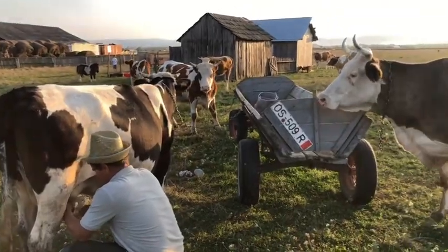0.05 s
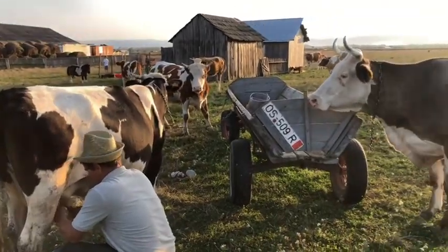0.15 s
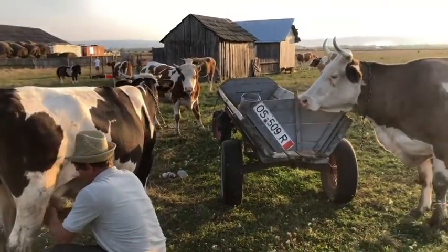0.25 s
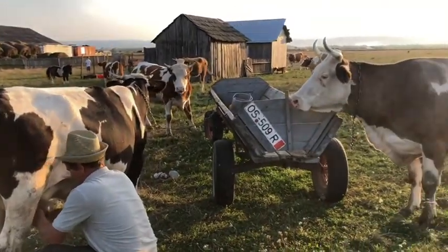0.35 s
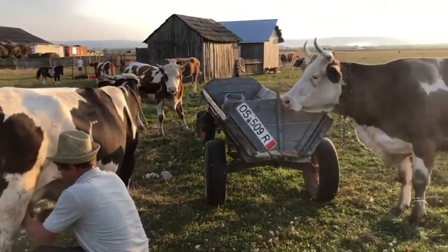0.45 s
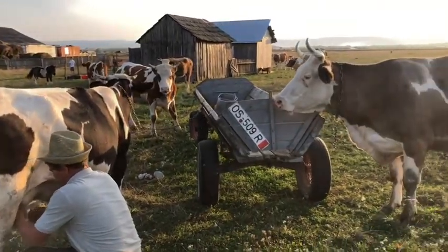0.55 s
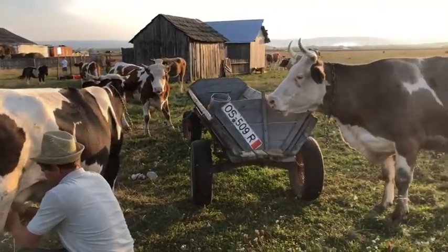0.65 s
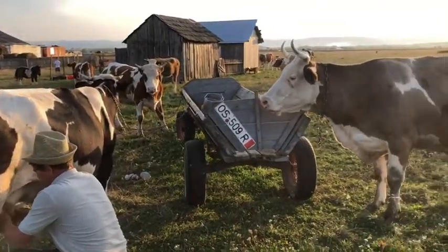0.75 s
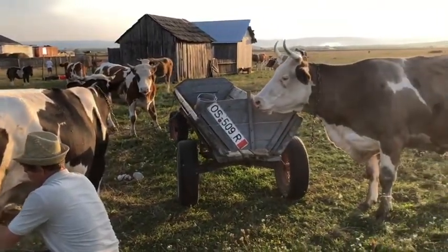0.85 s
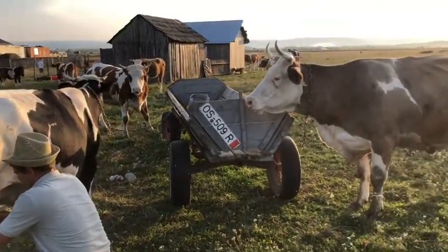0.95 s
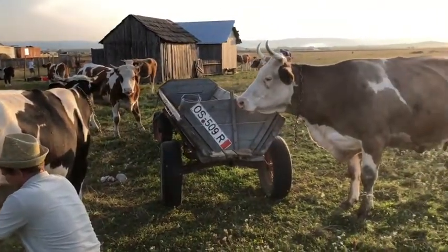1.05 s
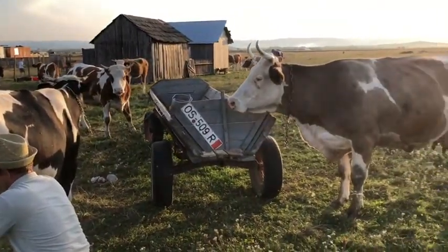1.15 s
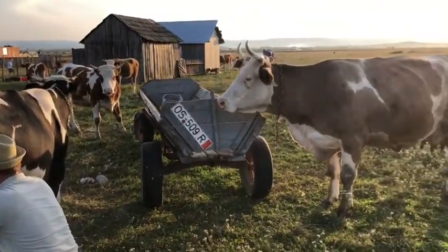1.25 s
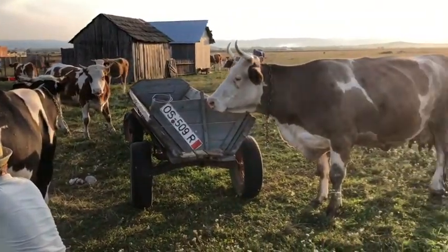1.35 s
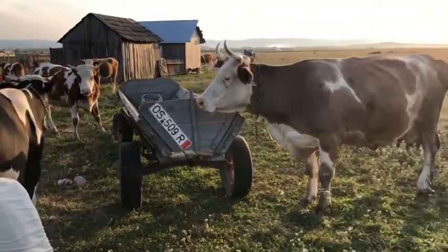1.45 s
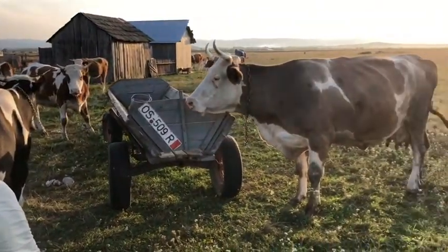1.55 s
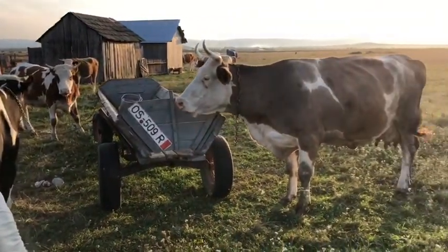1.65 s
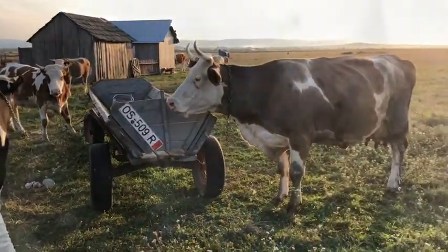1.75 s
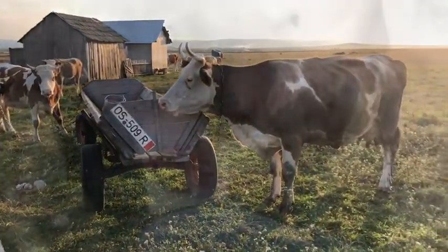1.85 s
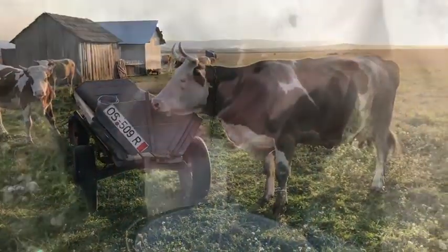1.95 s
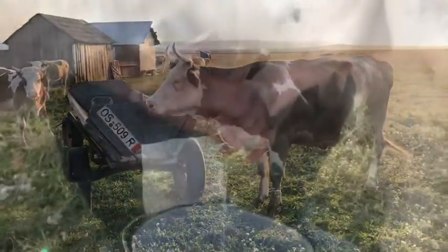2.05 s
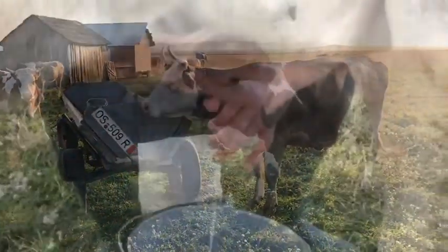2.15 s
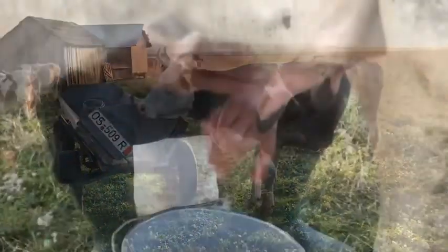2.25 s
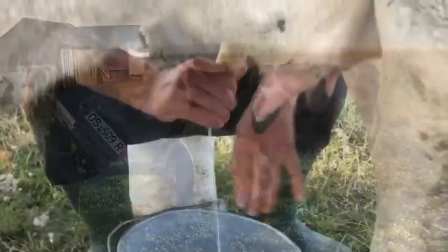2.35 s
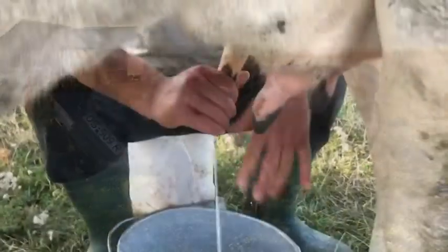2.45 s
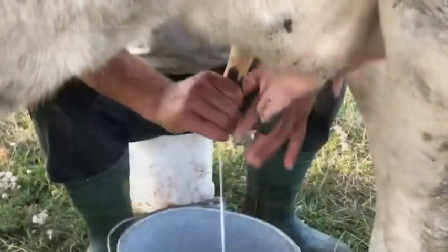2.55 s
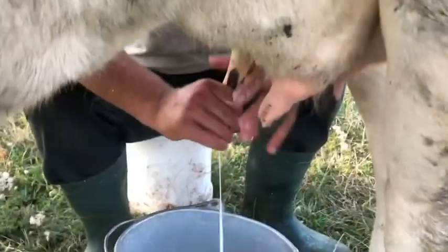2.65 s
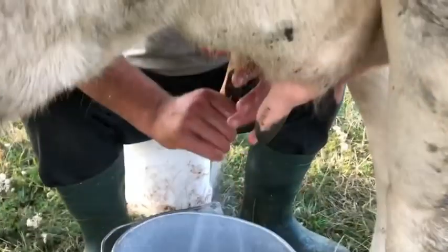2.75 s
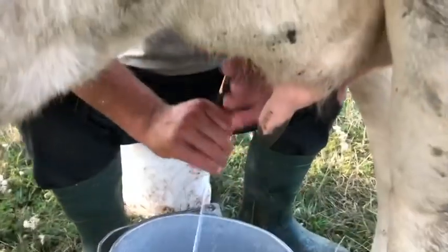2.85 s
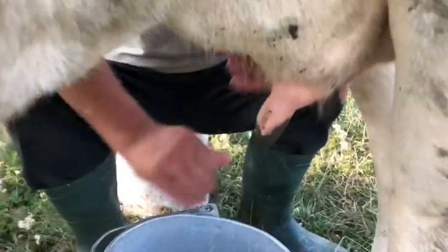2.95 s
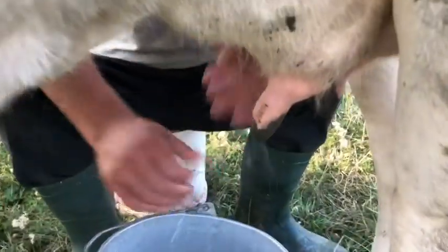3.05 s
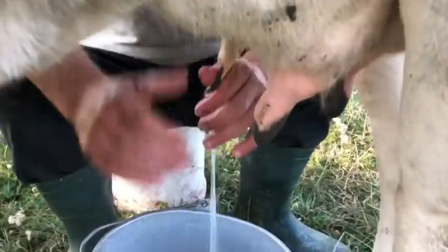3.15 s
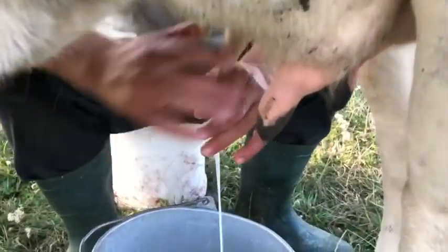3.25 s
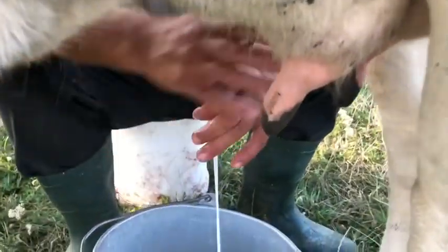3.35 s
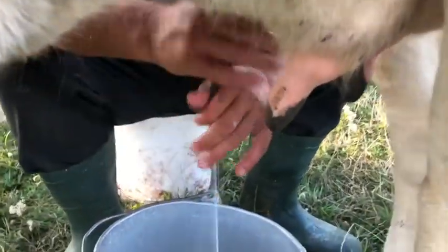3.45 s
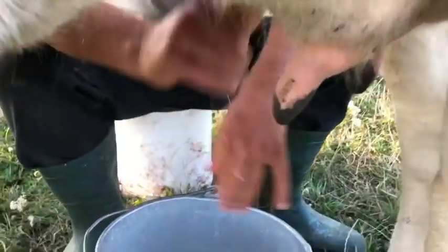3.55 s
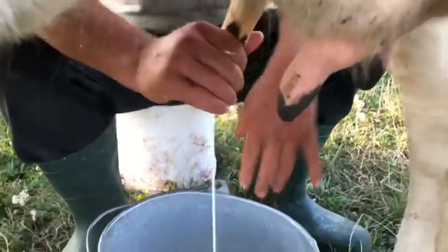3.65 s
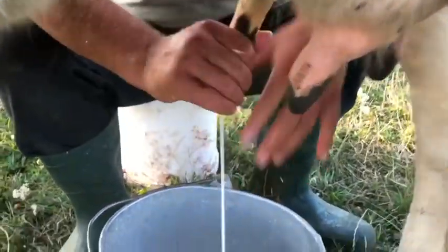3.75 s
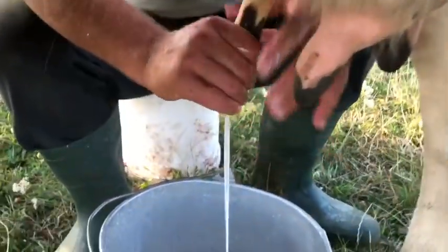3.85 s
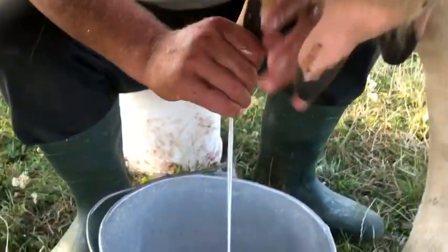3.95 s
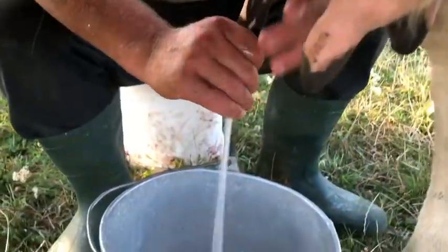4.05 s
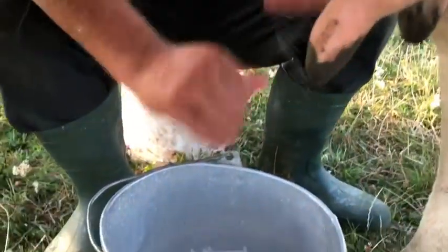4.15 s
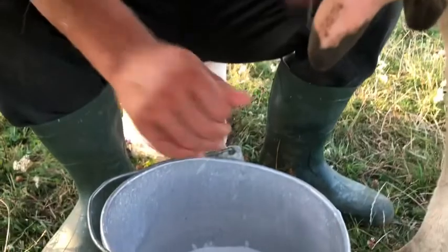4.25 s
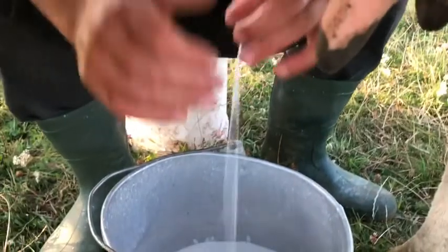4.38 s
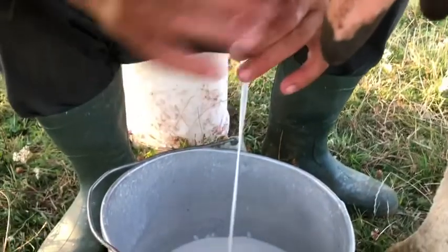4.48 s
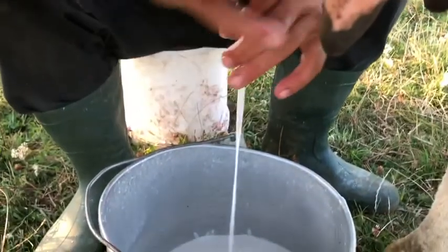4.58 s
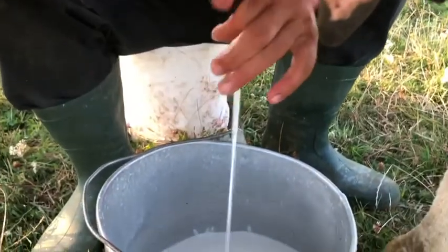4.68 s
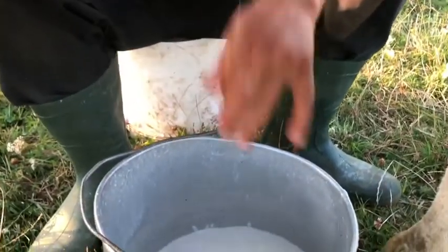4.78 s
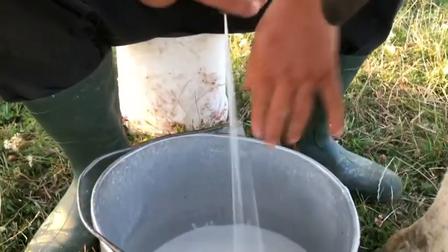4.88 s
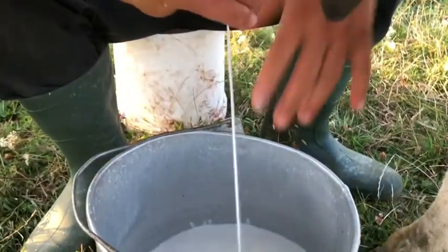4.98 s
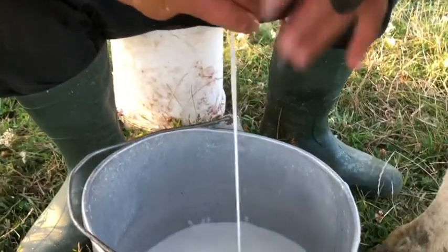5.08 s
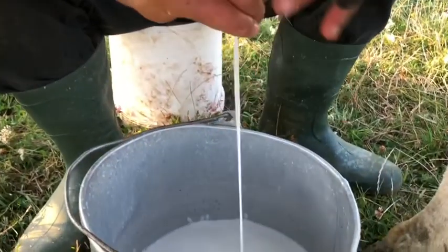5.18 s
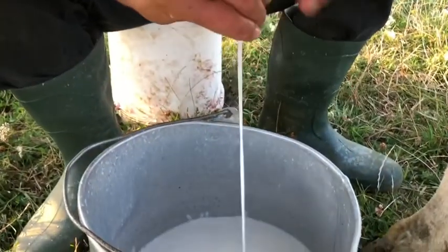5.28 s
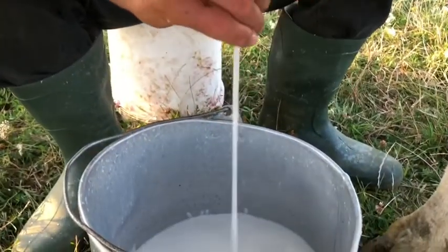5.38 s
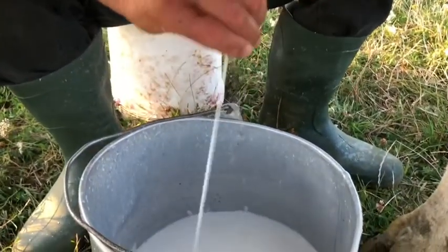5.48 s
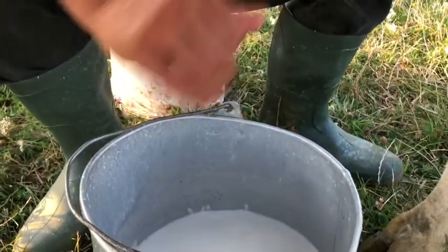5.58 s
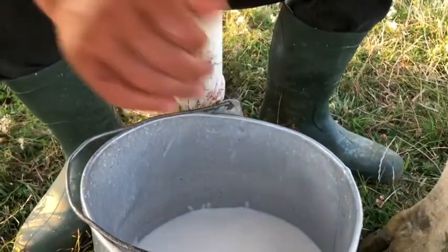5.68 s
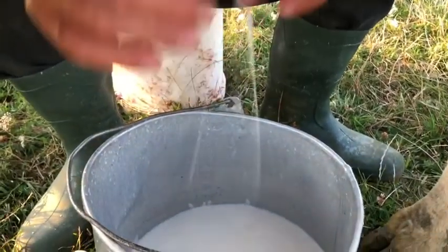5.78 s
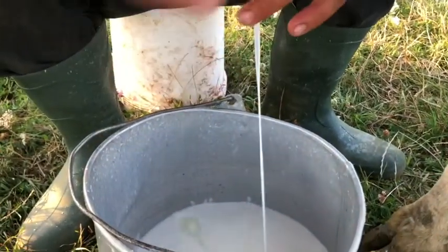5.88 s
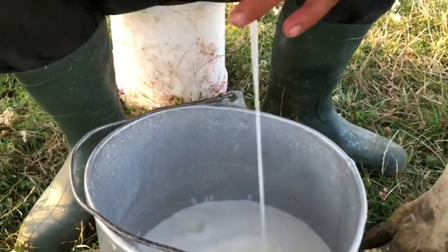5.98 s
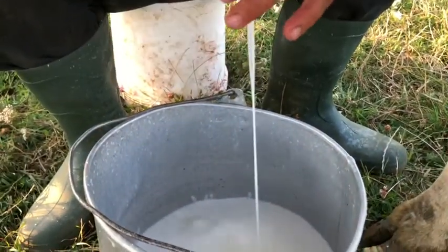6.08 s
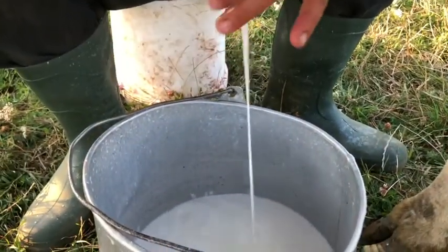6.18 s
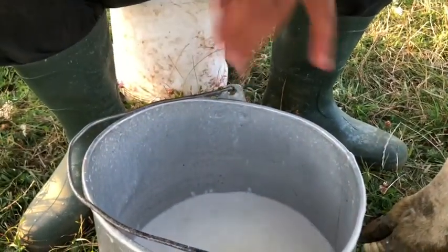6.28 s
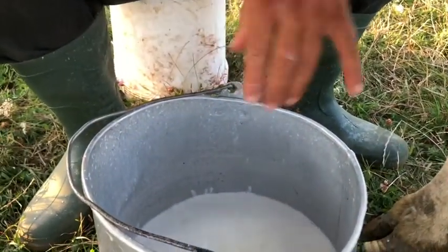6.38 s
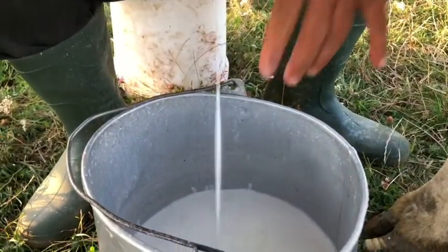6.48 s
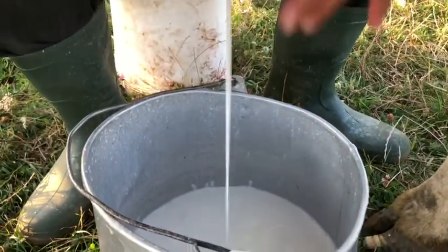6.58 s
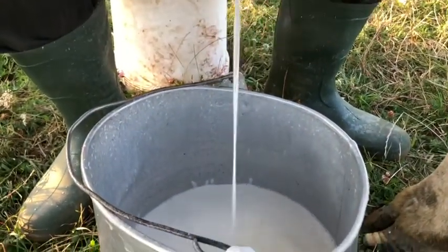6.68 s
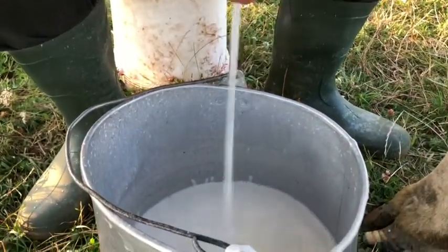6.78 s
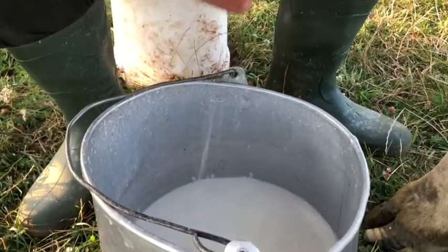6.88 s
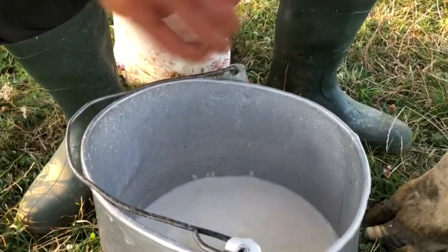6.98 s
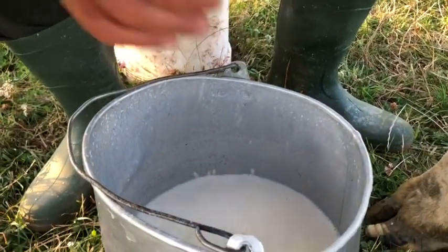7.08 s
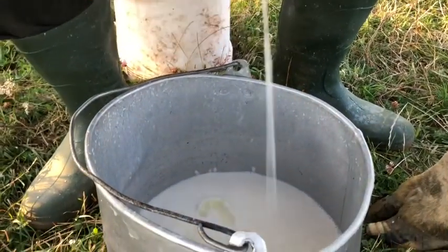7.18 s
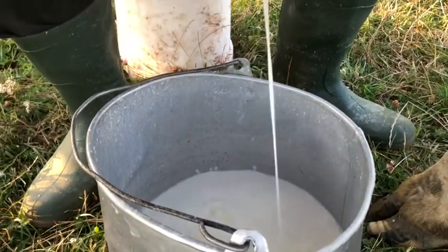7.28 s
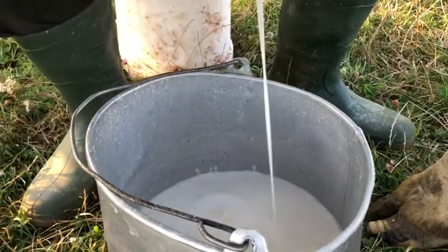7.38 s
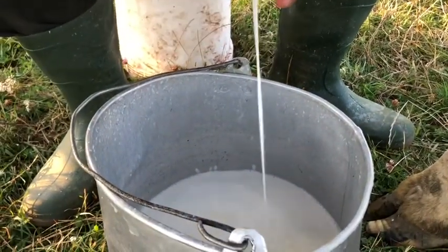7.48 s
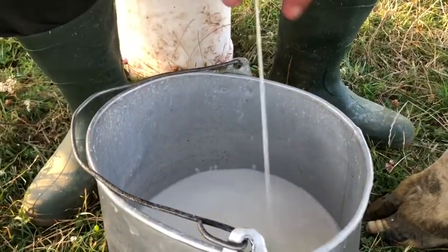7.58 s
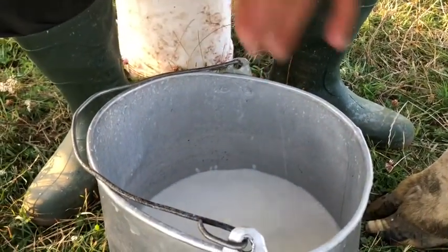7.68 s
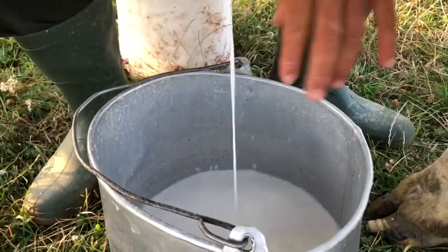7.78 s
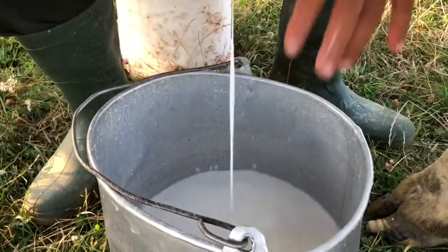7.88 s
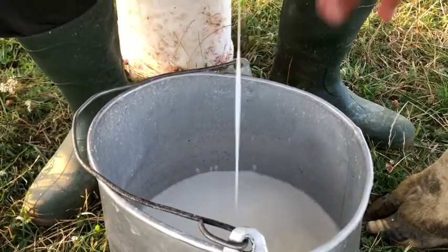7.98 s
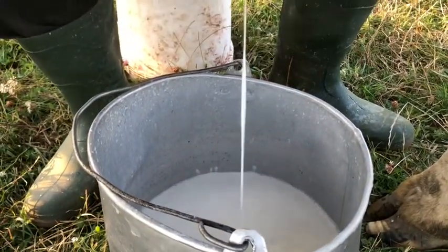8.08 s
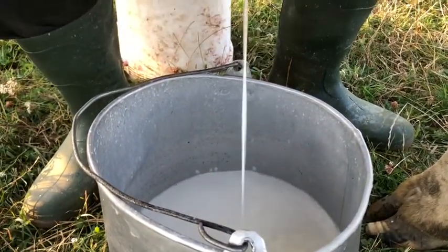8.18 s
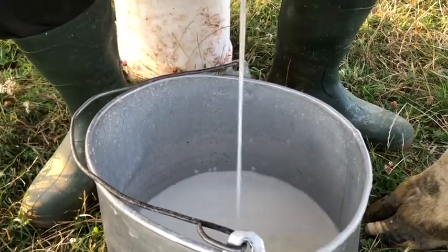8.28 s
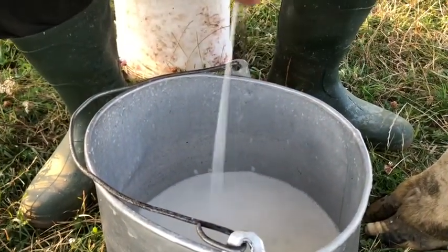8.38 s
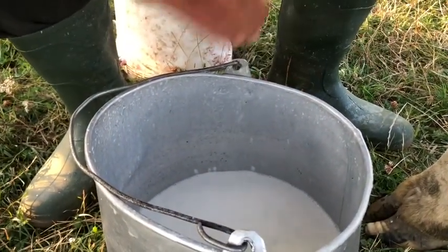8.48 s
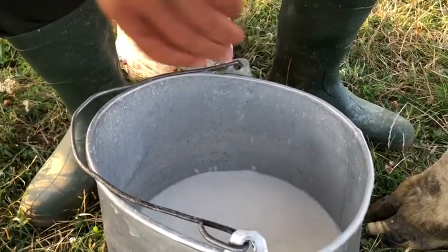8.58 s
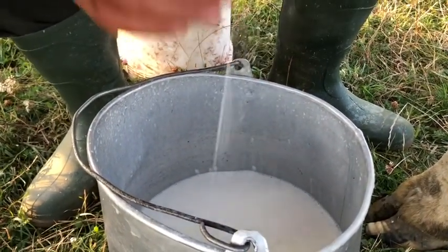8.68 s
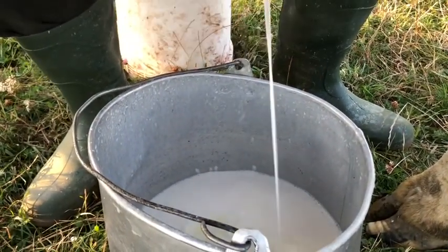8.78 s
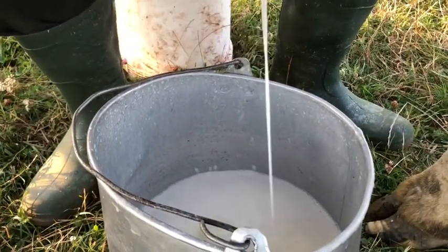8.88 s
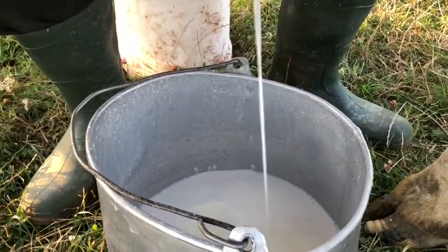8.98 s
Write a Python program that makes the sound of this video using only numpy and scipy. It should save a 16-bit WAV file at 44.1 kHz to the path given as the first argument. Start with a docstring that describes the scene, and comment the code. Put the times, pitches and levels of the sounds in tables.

```python
"""Hand milking in an open pasture, over light wind and the hush of the field.
Faint jets from afar open the scene: noise hiss, ringing air bubbles and resonant pail modes under each.
A cow then lows softly once, a few clean harmonics rising with the mouth shut.
From there the milk hits the froth up close: splats, hiss, gurgling air pockets and a drumming metal pail.
Droplets patter after each jet, and drips tick now and then to the end."""
import sys
import numpy as np
from scipy import signal
from scipy.io import wavfile
from scipy.ndimage import uniform_filter1d, map_coordinates

SR = 44100
rng = np.random.default_rng(int(sys.argv[2]) if len(sys.argv) > 2 else 0)


def to_wav(s):
    """Save 16-bit WAV."""
    ch = np.atleast_2d(s).T  # columns
    pcm = np.round(np.clip(ch, -1, 1) * 32767)  # PCM
    wavfile.write(sys.argv[1], SR, pcm.astype(np.int16))


N = 398223  # length in samples

# one squeeze of the teat a row: landing t/s, plunge delay/s, flow length/s, fade/(dB per s), splat level/dB,
# early and late spray level/dB, early and late bubbling level/dB, early and late drumming level/dB,
# then by landing spot: deep, middle and upper pail mode level/dB (levels before the final mix trims)
JETS = [(.229, 0.02, .26, 230, -39, -55, -54, -40, -47, -51.5, -53.5, 2.5, -14, 7),
        (0.716, 0.022, .23, 258, -41, -51.5, -52.5, -35.5, -53, -47, -53, 6, -14, 5),
        (1.188, .004, 0.083, 500, -39, -51, -53.5, -60, -74, -50, -56, 8.5, -6, -3),
        (1.745, .02, 0.046, 300, -72, -65, -54.5, -57, -54, -69, -61, 1, 4, 2),
        (2.025, 0.052, 0.24, 262, -36, -43.5, -34, -33, -46, -47, -39.5, -16, -5, -1.5),
        (2.459, 0.0058, 0.53, 475, -18, -41.5, -31.5, -32.5, -35.5, -40.5, -39.5, -4.5, 1, 1),
        (3.230, 0.059, 0.33, 415, -15, -41, -30, -25.5, -35, -38.5, -30, -11, -3, -6.5),
        (3.7232, 0.017, .47, 383, -17.5, -38.5, -28.5, -27.5, -38, -32, -36.5, -9.5, -9, 3),
        (4.4723, 0.055, 0.36, 554, -13.5, -33.5, -25, -29.5, -34, -35, -32, -0.5, -1, -8.5),
        (4.985, 0.031, 0.64, 380, -16, -34, -34, -29.5, -35, -33, -32, 1.5, -12, -4),
        (5.904, 0.059, 0.45, 396, -12.5, -36, -31, -35.5, -27, -38, -30.5, -4, -1, -4),
        (6.528, 0.014, 0.45, 420, -16, -34.5, -32.5, -26.5, -39, -30, -39, -6.5, 3, -0.5),
        (7.232, 0.025, 0.46, 230, -11, -40, -30.5, -31, -29.5, -35, -29, -5, -2, -8.5),
        (7.8411, 0.016, 0.683, 380, -17.5, -33, -30.5, -36.5, -33, -33.5, -32.5, -0.5, -1.5, -0.5),
        (8.802, 0.058, 0.41, 397, -15, -36, -38, -25.5, -37, -36, -35.5, -4, 8, -2)]
# the jet slips out of its hole and bubbling drops: t/s, length/s, level/dB
LAPSES = [(2.843, 0.085, -29), (3.372, 0.06, -8), (4.604, 0.13, -6), (7.348, 0.11, -3)]
# colour of the spray hiss: f/Hz, relative level/dB
SPRAY = [(900, -57), (1800, -13.5), (3000, 1.5), (4500, -2), (7000, 2), (11000, 1.5), (14500, 3),
         (16000, 0)]
# colour of the froth by bubble size: f/Hz, relative level/dB
FROTH = [(800, -5), (1850, 0.5), (2500, -4), (3300, -4.5), (4300, -10.5), (6500, -14.5)]
# ringing modes of the pail: f/Hz, width/Hz, relative level/dB
PAIL = [(172, 4.4, -22.5), (305, 21.5, 1.5), (490.3, 19, -3), (658, 27, -1.5), (729.5, 27, 3.5),
        (849, 23, -9.5), (933, 29, -2.5), (1069, 29, -2), (1175, 32, -7)]
# air pockets singing under the jet: t/s, length/s, f/Hz, level/dB
GURGLES = [(0.261, 0.097, 1720, -43), (0.263, 0.18, 1150, -47), (0.272, 0.17, 2580, -48.5),
           (0.732, 0.12, 1720, -45), (0.736, 0.12, 1080, -45), (2.122, 0.068, 2700, -35),
           (2.487, 0.055, 1410, -35.5), (2.58, 0.123, 3320, -35), (2.63, 0.12, 1100, -38),
           (3.766, 0.06, 1890, -33), (3.799, 0.34, 743, -35.5), (3.844, 0.028, 2840, -28.5),
           (4.539, 0.059, 2270, -29), (4.542, 0.075, 1140, -34.5), (4.634, 0.067, 314, -34),
           (4.738, 0.029, 4430, -29.5), (4.766, 0.042, 3420, -31.5), (5.014, 0.083, 2550, -32),
           (5.157, 0.049, 2070, -31), (5.312, 0.19, 942, -32.5), (5.968, 0.072, 2090, -26.5),
           (6.289, 0.063, 1000, -30), (6.54, 0.09, 1620, -28), (7.254, 0.084, 1890, -35),
           (7.54, 0.1, 1700, -32), (7.865, 0.073, 1680, -29), (8.133, 0.26, 870, -35.5),
           (8.865, 0.11, 1286, -33.5), (8.862, 0.094, 2040, -28.5)]
# single drops: t/s, tick peak level/dB, bubble ring peak level/dB, bubble f/Hz
DRIPS = [(0.551, -40, -46, 3200), (1.052, -54, -53, 3500), (2.3144, -30, -34, 3210),
         (2.3294, -27, -44, 2300), (2.3738, -50, -45, 3000), (3.043, -30, -48, 3740),
         (3.064, -31.5, -36, 3350), (3.077, -47, -35, 3300), (3.096, -55, -31, 3440),
         (3.2400, -11, -39, 2980), (3.244, -12, -39, 3000), (3.6451, -56, -44, 3370),
         (4.076, -13, -21.5, 2650), (4.518, -30, -26, 3470), (4.668, -14, -20.5, 2460),
         (4.8212, -11, -22, 2450), (4.896, -39, -42, 3300), (4.914, -50, -44, 2900),
         (4.9426, -32, -60, 3200), (5.645, -52, -39, 2070), (5.7153, -50, -45, 1900),
         (6.4464, -52, -39, 2700), (6.869, -28, -23, 8500), (6.95, -18, -23, 8600), (7.279, -28, -22, 1810),
         (7.3344, -28, -19, 2040), (8.3648, -18.5, -34, 3200), (8.5117, -26.5, -24.5, 1360),
         (8.81, -11, -29, 4500), (8.8462, -24, -21, 6540)]
# thin falling whistle in a weak squirt: t/s, length/s, start f/Hz, end f/Hz, level/dB
WHISTLE = (1.186, .07, 2350, 2120, -52)
# taps of a small metal ring: t/s, peak level/dB
CLINKS = [(0.1017, -49)]
# partials of that ring: f/Hz, relative level/dB, 60 dB decay/s
RING = [(8400, -1, 0.073), (12770, -6, 0.08), (13360, -6, 0.11)]
# dull low knocks: t/s, level/dB, f/Hz
THUMPS = [(1.191, -46, 278), (1.2, -51, 145), (2.393, -40.5, 332), (4.77, -42, 168), (6.989, -39.5, 107),
          (7.7, -45.5, 109)]
# course of the cow's call: t/s, f/Hz, level/dB
LOWING = [(1.62, 105.3, -65), (1.75, 108.3, -60.5), (1.95, 112.2, -59.5), (2.09, 130, -60),
          (2.26, 162, -55), (2.36, 184, -63), (2.451, 188, -64)]
# harmonics of the closed mouth: multiple of the pitch, level/dB
LOW_TONES = [(1, 2), (2, 0.5), (3, -16.5), (6, -10), (7, -17)]
# colour of the open air: f/Hz, relative level/dB
FIELD = [(40, -5.5), (110, -6.5), (170, -10.5), (500, -15), (1100, -31), (1600, -22.5), (3000, -24),
         (16000, -26.5)]
# treble of the field, louder near the fizzing froth: t/s, level/dB
HUSH = [(0.3, -74), (1.6, -75.5), (1.95, -68.5), (2.4, -63.5), (9.03, -63)]
# soft wash near 1 kHz: t/s, level/dB
WASH = [(0, -61), (1.4, -65), (1.9, -63.5), (2.5, -64)]
# wind rumble: t/s, level/dB
WIND = [(0, -60), (.4, -60.5), (1.2, -66), (2.3, -64), (3.0, -60), (4.0, -62), (6.3, -59), (9.03, -58)]

ONSET_S, PLUNGE_S = 0.0077, 0.015  # fade-in of a jet; time its plunge takes
GONE_DB = -45.5  # a jet is cut once its fade reaches this
HEAD_DB, DIP_DB, SETTLE_S = 5.5, -1.5, 0.073  # spray: loud on closed froth, muffled by the plunge, settled
SHALLOW_DB, AIR_STOPS_S = -22.5, 0.02  # bubbling before the plunge; it stops this long before the flow
DRUM_START_DB, DRUM_RISE_S, DRUM_FADE = -8.5, 0.059, 0.77  # the pail rings up; its fade as share of the spray's
PATCHY_DB, SWARM_DB = 3.2, 5  # unevenness of the spray and of the bubble swarms
DETUNE, SPOT_DB = 0.025, 4  # largest mode shift (share) and level change per jet
SAG_PER_S = 0.71  # pitch drop of small pockets (share per s)
TRICKLE_PER_S, TRICKLE_DB, TRICKLE_S = 120, -5, 0.067  # droplet rate; least offset; time to lose 10 dB
NOSE_HZ, NOSE_DB = 320, 9  # cow harmonics near this pitch are lifted
FIELD_DB, WIND_HZ = -55.5, 141  # air level before its bands are set; upper edge of the rumble
EDGE_HZ = 15880  # upper band limit


def gain_of(db):
    """Turns decibels into an amplitude factor."""
    return 10 ** (np.asarray(db) / 20)


def evened(x):
    """Scales a sound to rms 1."""
    return x / np.sqrt(np.mean(x ** 2) + 1e-20)


def read(points, at):
    """Reads a colour curve on a logarithmic frequency scale."""
    f, value = np.transpose(points)
    return np.interp(np.log(at + 1), np.log(f + 1), value)


def add(mix, s, sound):
    """Lays a sound into the mix at s seconds, cut at the end of the mix."""
    part = mix[round(s * SR):][:len(sound)]
    part += sound[:len(part)]


def resonate(x, hz, width):
    """Shifts the curve hz down to zero, smooths, and shifts back: a resonance of gain 1."""
    turn = np.exp(2j * np.pi * np.cumsum(hz * np.ones(len(x))) / SR)
    r = np.exp(-np.pi * width / SR)
    smooth = signal.lfilter([1 - r], [1, -r], x / turn + 1e-18)
    return 2 * (turn * smooth).real


def wander(seconds):
    """Random drift of rms 1 that changes over the given time."""
    span = max(round(seconds * SR), 2)
    return evened(uniform_filter1d(uniform_filter1d(rng.standard_normal(N), span), span))


def noise(points, patchy_db, size=512):
    """Random short-time spectra of a given colour, with drifting patches."""
    hop = size // 4
    a, b, patches = rng.standard_normal((N // hop + 5, size // 2 + 1, 3)).T
    patches = evened(uniform_filter1d(uniform_filter1d(patches, 6, 0), 16, 1))
    colour_db = read(points, np.fft.rfftfreq(size, 1 / SR))[:, None]
    spectra = (a + 1j * b) * gain_of(colour_db + patchy_db * patches)
    return evened(signal.istft(spectra, nperseg=size, noverlap=size - hop)[1][:N])


def jets():
    """Spray, bubbles and pail follow their own level curves and share the sputter of the stream."""
    spray_gain, froth_gain, drum_gain = controls()
    sputter = 2.66 * np.tanh(wander(0.011) / 2)
    push = rng.standard_normal(N) * gain_of(0.29 * sputter)
    drum = pail(push * drum_gain)
    drum *= np.linalg.norm(drum_gain) / np.linalg.norm(drum)
    hiss = spray_gain * spray(gain_of(1.3 * sputter))
    froth = froth_gain * bubbles(gain_of(2.12 * sputter))
    return hiss + gain_of(-0.5) * froth + gain_of(-2.5) * drum


def controls():
    """Gains of spray, bubbling and drumming over the whole scene; zero between jets."""
    out = np.zeros((3, N))
    for s, plunge, flow, fade, _, *db in JETS:
        t = np.arange(0, flow - GONE_DB / fade, 1 / SR)
        levels = stream(t, plunge, flow, fade, db[0:2], db[2:4], db[4:6])
        for track, level_db in zip(out, levels):
            add(track, s, np.minimum(t / ONSET_S, 1) * gain_of(level_db))
    for s, length, db in LAPSES:
        span = slice(round(s * SR), round((s + length) * SR))
        out[1, span] *= gain_of(db * signal.windows.tukey(span.stop - span.start, .4))
    return out


def stream(t, plunge, flow, fade, spray_db, froth_db, drum_db):
    """Levels in dB of one jet's three sounds: landing, plunge, steady flow, dying away."""
    def along(ends):
        return np.interp(t, [0, flow], ends)

    def after(s):
        return fade * np.maximum(t - s, 0)

    under = plunge + PLUNGE_S
    head = np.interp(t, [0, under, under + SETTLE_S], [HEAD_DB, DIP_DB, 0])
    shallow = np.interp(t, [plunge, under], [SHALLOW_DB, 0])
    ring_up = np.interp(t, [0, DRUM_RISE_S], [DRUM_START_DB, 0])
    return (along(spray_db) + head - after(flow),
            along(froth_db) + shallow - after(flow - AIR_STOPS_S),
            along(drum_db) + ring_up - DRUM_FADE * after(flow))


def spray(sputter):
    """The jet breaks into droplets: a crackling hiss, mirrored by the pail wall."""
    fat_drops = (rng.random(N) < 250 / SR) * np.minimum(rng.exponential(0.71, N), 2.4)
    crackle = 1 + signal.lfilter([1], [1, -np.exp(-1 / (0.00085 * SR))], fat_drops)
    hiss = noise(SPRAY, patchy_db=PATCHY_DB) * gain_of(2.0 * wander(0.00052)) * crackle * sputter
    for delay_s, share in [(.00044, .33), (.00095, .25)]:
        # the path by the wall shifts as the jet wanders
        lag = delay_s * SR * (1 + .06 * wander(.4))
        hiss = hiss + share * map_coordinates(hiss, [np.arange(N) - lag], order=3)
    # the treble sets the loudness
    top = signal.sosfilt(signal.butter(4, 4500, "high", fs=SR, output="sos"), hiss)
    return hiss / top.std()


def bubbles(sputter, per_s=250, cycles=18.0, count=28):
    """Trapped air rings briefly with rising pitch, in swarms of one size; the pail's depth echoes it."""
    out = np.zeros(N)
    swarms = evened(uniform_filter1d(rng.standard_normal((count, N // 500 + 1)), 8))
    swarms = gain_of(SWARM_DB * swarms)
    for f, swarm in zip(np.geomspace(800, 6500, count), swarms):
        train = (rng.random(N) < per_s / SR) * gain_of(2.0 * np.minimum(rng.exponential(1, N), 5))
        train = train * np.repeat(swarm, 500)[:N]
        turns = np.arange(0, 30, f / SR)
        ping = np.sin(2 * np.pi * turns * (1 + 0.00635 * turns))
        ping *= np.exp(-np.pi * turns / cycles) * np.minimum(turns, 1)
        out += signal.oaconvolve(train, ping * gain_of(read(FROTH, f)) * f / 2000)[:N]
    out *= sputter
    lag = 0.004 * SR * (1 + 0.052 * wander(0.32))
    out = out + 0.51 * map_coordinates(out, [np.arange(N) - lag], order=1)
    # ride the slow level flat so the jet curves set it
    return out / np.sqrt(uniform_filter1d(out ** 2, SR // 8) + 1e-9)


def pail(drive):
    """The stream shakes the pail: narrow modes over a broad slosh; the landing spot sets their mix."""
    s, *_, deep_db, middle_db, upper_db = np.transpose(JETS)
    jet = np.maximum(np.searchsorted(s, np.arange(N) / SR) - 1, 0)  # latest jet at each sample
    slosh = resonate(resonate(drive, 580, 530), 580, 530)
    out = gain_of(5.5) * slosh / np.sqrt(600)
    for f, width, db in PAIL:
        spot_db = (deep_db if f < 400 else middle_db if f < 600 else upper_db)[jet]
        # each jet loads the wall elsewhere
        shift, share = rng.uniform(-0.93, 1, (len(s), 2))[jet].T
        drift = 1 + DETUNE * shift + 0.01 * wander(0.15)  # the sloshing milk loads the wall unevenly
        flutter = gain_of(db + 4 * wander(.05))
        mode = resonate(drive * gain_of(spot_db + SPOT_DB * share), f * drift, width)
        out += flutter * mode / np.sqrt(width)
    return out


def gurgles():
    """Uneven droplet knocks ring the air pocket while it lasts; its size wavers, a small one rings wider."""
    out = np.zeros(N)
    knock = rng.standard_normal(N) * gain_of(2.2 * wander(0.00041) + 2.0 * wander(0.001))
    waver = 1 + 0.029 * wander(0.039)
    for s, length, hz, db in GURGLES:
        drive, pitch = (x[round(s * SR):][:round(length * SR)] for x in (knock, hz * waver))
        if hz > 1300:  # small pockets grow and drop in pitch
            pitch = pitch * (1 + SAG_PER_S * (length / 2 - np.arange(len(drive)) / SR))
        width = 15 + 65 * (hz / 1000) ** 1.9
        pocket = evened(resonate(resonate(drive, pitch, width), pitch, 2 * width))
        add(out, s, gain_of(db) * pocket * signal.windows.tukey(len(drive), .4))
    return out


def splashes():
    """A splat is a bright puff of a few ms; a drip is a dry tick and a small bubble ringing roughly."""
    out, t = np.zeros(N), np.arange(1500) / SR
    bright = signal.butter(2, 2200, "high", fs=SR, output="sos")
    for s, db in np.array(JETS)[:, [0, 4]]:
        puff = evened(signal.sosfilt(bright, rng.standard_normal(len(t))))
        add(out, s, 0.44 * gain_of(db) * puff * (t / 0.0021) * np.exp(1 - t / 0.0017))
    for s, tick_db, ring_db, hz in DRIPS:
        puff = rng.standard_normal(len(t))
        tick = signal.sosfilt(bright, puff) * np.exp(-t / 0.0018)
        ring = resonate(puff * np.exp(-t / 0.0042), hz, 0.18 * hz)
        add(out, s, gain_of(tick_db) * tick / abs(tick).max())
        add(out, s, gain_of(ring_db) * ring / abs(ring).max())
    return out


def trickle():
    """After each jet a few droplets patter on the froth, each a short puff of its own colour."""
    out, t = np.zeros(N), np.arange(400) / SR
    for s, _, flow, _, _, _, late_db, *_ in JETS:
        wait, pitch, size = rng.random((12, 3)).T
        landings = np.cumsum(-np.log(wait)) / TRICKLE_PER_S
        for after, hz, db in zip(landings, 1900 * 4.5 ** pitch, 8.4 * size):
            level_db = late_db + TRICKLE_DB + db - 10 * after / TRICKLE_S
            puff = rng.standard_normal(len(t)) * np.exp(-t / 0.0022)
            add(out, s + flow + after, gain_of(level_db) * resonate(puff, hz, 0.22 * hz))
    return out


def whistle():
    """A weak squirt whistles: a sine gliding down, with narrow breath noise around it."""
    out = np.zeros(N)
    s, length, from_hz, to_hz, db = WHISTLE
    hz = np.linspace(from_hz, to_hz, round(length * SR))
    breath = evened(resonate(rng.standard_normal(len(hz)), hz, 60))
    breathy = breath / 2 + np.sin(2 * np.pi * np.cumsum(hz) / SR)
    shape = np.linspace(1, .7, len(hz)) * signal.windows.tukey(len(hz), .2)
    add(out, s, gain_of(db) * breathy / 2 * shape)
    return out


def knocks():
    """Faint metal clinks and dull low thumps, all decaying sines."""
    out, t = np.zeros(N), np.arange(SR // 3) / SR
    ring = sum(gain_of(db - 60 * t / t60) * np.sin(2 * np.pi * hz * t) for hz, db, t60 in RING)
    for s, db in CLINKS:
        add(out, s, gain_of(db) * ring / abs(ring).max())
    for s, db, hz in THUMPS:
        thump = np.sin(2 * np.pi * hz * t) * np.minimum(t / 0.0087, 1)
        add(out, s, gain_of(db - 60 * t / 0.36) * thump)
    return out


def cow():
    """A soft rising hum with the mouth shut: a few clean harmonics, lifted near one resonance."""
    out = np.zeros(N)
    s, *columns = np.transpose(LOWING)
    t = np.arange(s[0], s[-1], 1 / SR)
    hz, db = (np.interp(t, s, c) for c in columns)
    turns = np.cumsum(hz * (1 + 0.006 * wander(0.015)[:len(t)])) / SR
    tone = np.zeros(len(t))
    for multiple, level_db in LOW_TONES:
        k = round(multiple)
        nose_db = NOSE_DB * np.exp(-((k * hz - NOSE_HZ) / 60) ** 2)
        tone += gain_of(level_db + nose_db) * np.sin(2 * np.pi * k * turns)
    add(out, s[0], np.sqrt(2) * gain_of(db) * tone * signal.windows.tukey(len(t), .15))
    return out


def field():
    """Light wind below, distant hush above, a soft wash near 1 kHz: coloured noise on slow level curves."""
    t = np.arange(N) / SR
    air = gain_of(FIELD_DB) * noise(FIELD, patchy_db=2.5, size=2048)
    low = signal.sosfiltfilt(signal.butter(2, 2500, fs=SR, output="sos"), air)
    low *= gain_of(1.3 * wander(.1))
    treble = evened(air - low)
    # swap the rumble for the same rumble on the wind curve
    rumble = signal.sosfiltfilt(signal.butter(2, WIND_HZ, fs=SR, output="sos"), low)
    wind = evened(rumble) * gain_of(np.interp(t, *np.transpose(WIND))) - rumble
    wash = evened(resonate(resonate(rng.standard_normal(N), 970, 680), 970, 680))
    wash *= gain_of(np.interp(t, *np.transpose(WASH)))
    hush = treble * gain_of(np.interp(t, *np.transpose(HUSH)))
    return low + wind + wash + hush


def scene():
    """All layers summed into one channel."""
    milk = jets() + gurgles() + splashes() + trickle() + whistle()
    return (milk + knocks() + cow() + field())[None]


def record(dry):
    """The microphone drops the deepest bass; then the band limit."""
    thin = signal.sosfilt(signal.butter(6, 42, "high", fs=SR, output="sos"), dry)
    band = signal.firwin(1023, EDGE_HZ, window=("kaiser", 9), fs=SR)
    return signal.oaconvolve(thin, band[None], "same")


dry = scene()
out = record(dry)
to_wav(out)
```